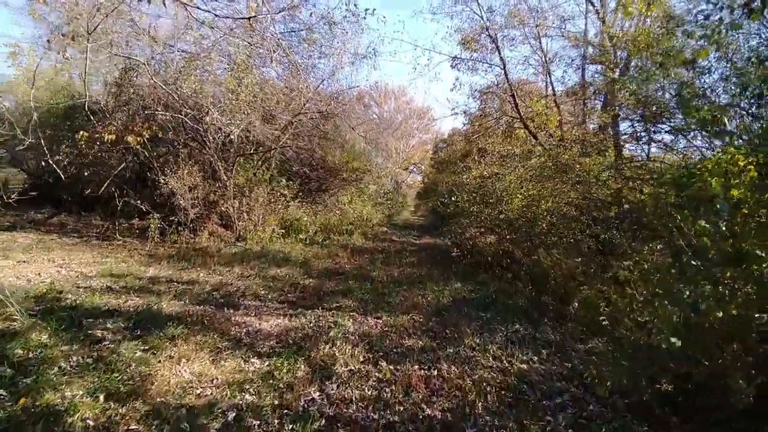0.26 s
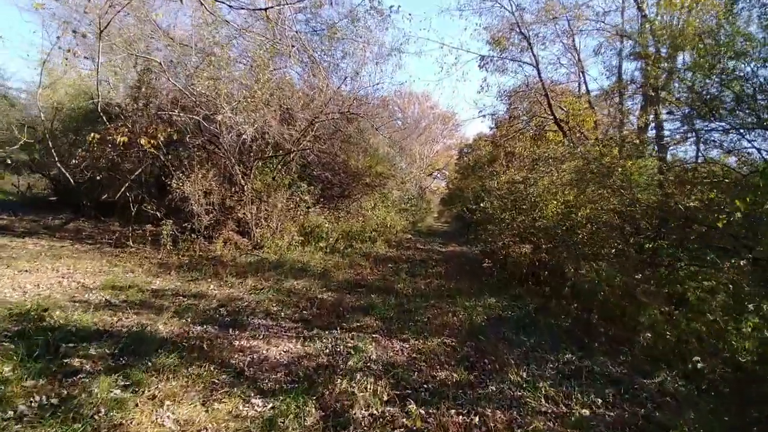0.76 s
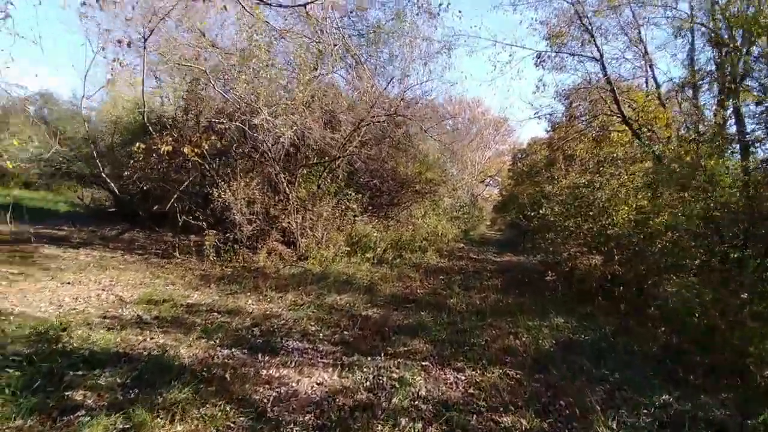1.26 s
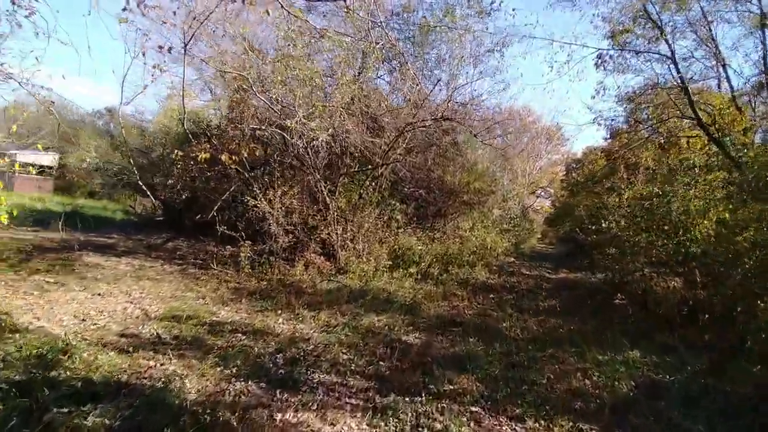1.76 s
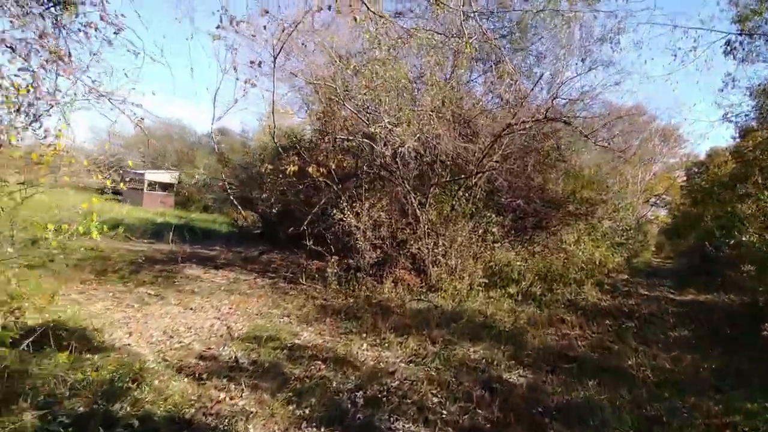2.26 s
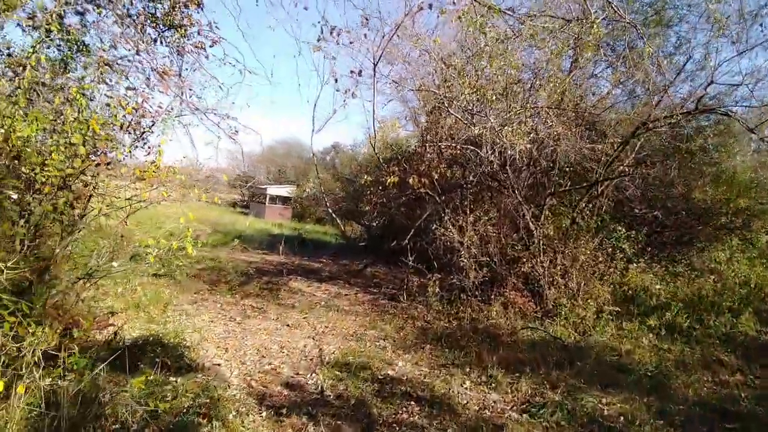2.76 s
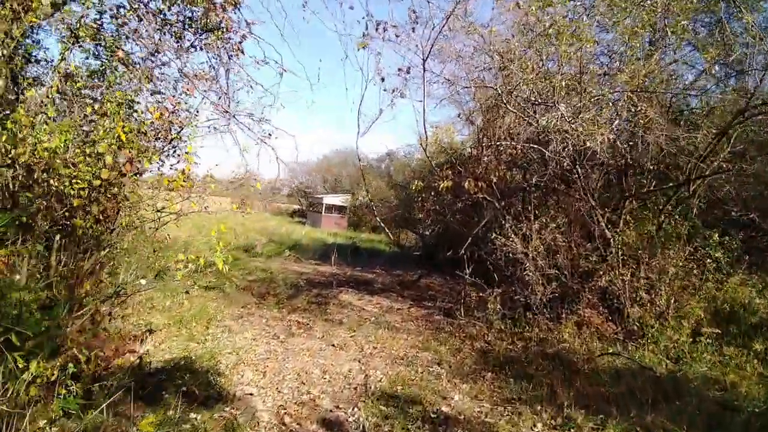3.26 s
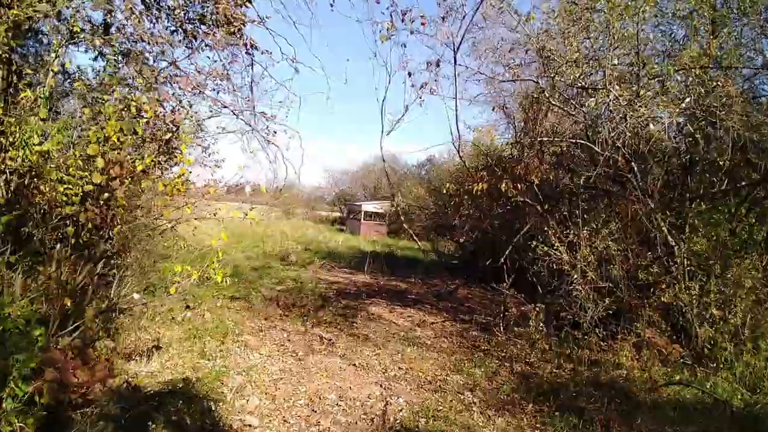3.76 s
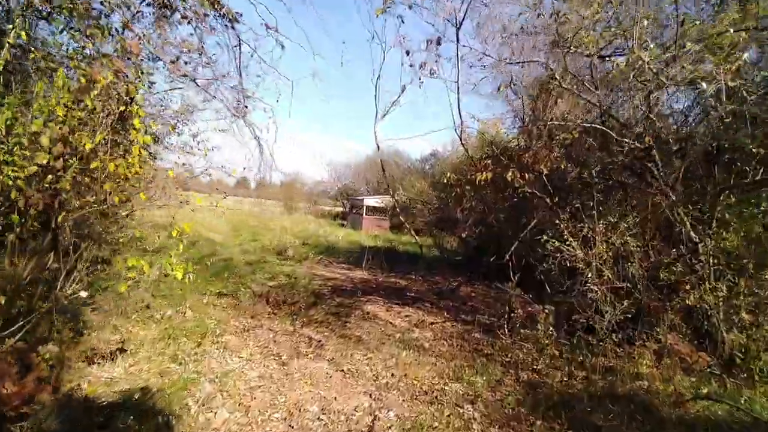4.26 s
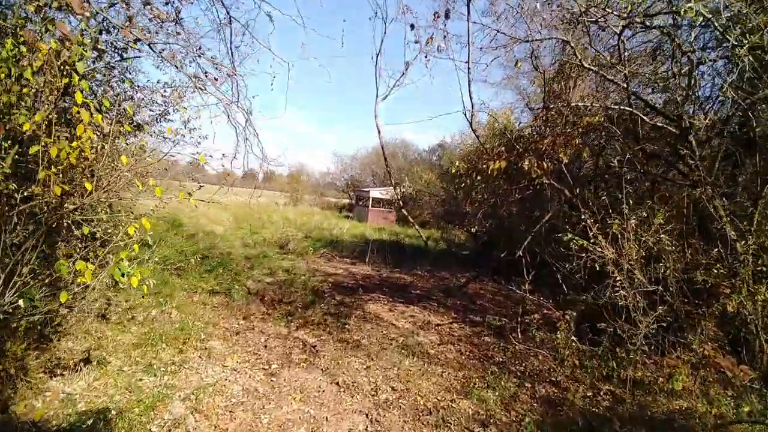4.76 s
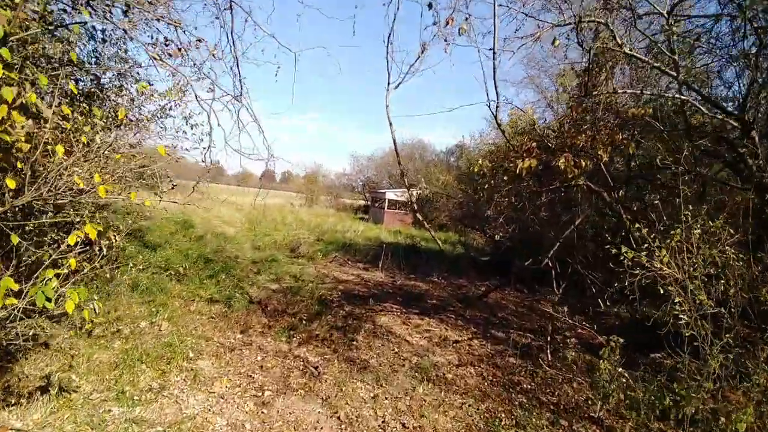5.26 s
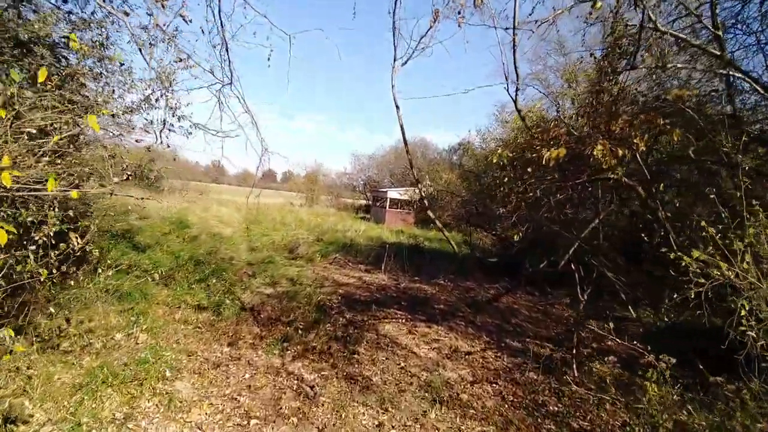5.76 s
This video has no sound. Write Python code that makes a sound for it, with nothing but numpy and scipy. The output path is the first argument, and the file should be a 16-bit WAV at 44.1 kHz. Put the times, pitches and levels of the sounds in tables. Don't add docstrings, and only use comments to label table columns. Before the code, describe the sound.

Walking through dry leaf litter on a quiet outdoor track, heard in stereo from a hand-held microphone above the feet. A crisp crunch starts at once and drags on to about 0.3 s, with sharp leaf snaps near 0.25 s. A fuller, louder crunch swells at 0.6-0.8 s, a softer one at 1.1-1.4 s, then a strong, abrupt one at 1.7-1.9 s. More crackling steps follow around 2.3-2.5, 2.9-3.1, 3.5-3.7 and 4.05-4.4 s, with thin rustles and little ticks between them. A heavier, duller step with a low thud lands near 4.85 s, trailing to 5.05 s. After that, only weaker rustles around 5.5-5.65 s and sparse dull twig ticks remain, fading almost to stillness. Beneath lie a faint airy hiss, slight low wind buffets mainly on the left early on, and a barely audible, wavering distant engine hum that fades.

```python
import sys
import numpy as np
from scipy import signal
from scipy.fft import rfft, irfft, next_fast_len
from scipy.io import wavfile
from scipy.ndimage import map_coordinates

SR = 44100
rng = np.random.default_rng(int(sys.argv[2]) if len(sys.argv) > 2 else 0)


def gain_from_decibels(decibels):
    exponent = np.asarray(decibels, float) / 20
    return 10 ** exponent


def transcribe(signal):
    frames = np.atleast_2d(signal).T
    limited = np.clip(frames, -1, 1)
    pcm = np.round(limited * 32767).astype(np.int16)
    wavfile.write(sys.argv[1], SR, pcm)


N = 264597

# peak_s [s], rise_s [s], rustle_db [dB], hold_s [s], weight_db [dB]
TREADS = [(0.008, 0.085, -37, .005, -7), (0.026, .03, -39.5, 0.26, -4.5), (0.588, 0.091, -33, 0.069, -6.5),
          (1.108, 0.019, -43, 0.1, -7), (1.718, 0.0064, -31, 0.073, -6.5),
          (2.317, 0.0095, -38.5, 0.013, -3), (2.341, 0.025, -36.5, 0.2, -4.5),
          (2.895, 0.011, -47.5, 0.056, 0), (3.101, 0.005, -44.5, 0.027, -2), (3.158, .02, -50.5, .005, -4),
          (3.502, .016, -39, 0.08, -8), (3.665, 0.091, -37, 0.061, -2), (4.056, 0.07, -43, 0.055, -0.5),
          (4.305, .006, -44, .005, -6), (5.71, .006, -52, 0.0053, 0), (4.36, 0.055, -41, 0.01, 0),
          (4.83, 0.024, -43, 0.031, 21.5), (4.868, 0.081, -36.5, 0.036, 0.5)]
# peak_s [s], rise_s [s], rustle_db [dB], hold_s [s], dullness_db
# [dB]
DRAGS = [(0.184, .1, -39.5, 0.1, -4), (0.619, 0.13, -32, 0.015, -2.5), (0.712, 0.074, -32.5, 0.032, 0.5),
         (1.306, 0.13, -39.5, 0.073, 0), (1.6, 0.067, -43, 0.029, 8.5), (1.644, .08, -39, 0.036, 1.5),
         (1.79, 0.08, -32.5, 0.045, 2.5), (1.844, 0.13, -39, 0.095, -1), (2.44, 0.13, -38.5, 0.015, -4),
         (2.634, .1, -46.5, 0.036, 0.5), (2.96, 0.11, -44, 0.078, 1), (3.04, .13, -36, 0.0094, -5.5),
         (4.138, 0.13, -40, 0.12, -5), (4.27, 0.093, -38.5, 0.022, -1.5), (4.4, 0.066, -41.5, 0.087, -8.5),
         (4.5, 0.13, -47.5, 0.058, -2.5), (5, .2, -43, 0.036, -1.6), (5.483, 0.079, -51.5, 0.19, 9.5),
         (5.577, 0.11, -43, 0.033, 5), (5.628, .1, -49, 0.058, 0.5)]
# peak_s [s], rise_s [s], rustle_db [dB], hold_s [s], dullness_db [dB]
STIRS = [(0.323, 0.037, -52.5, .13, 3), (0.808, 0.062, -48, 0.032, -5), (0.87, .05, -53.5, 0.068, 1),
         (1.004, .05, -67, .09, -4), (1.5, 0.17, -59, .05, 6.5), (1.973, 0.043, -51, 0.08, 0.5),
         (2.098, 0.0091, -57, .005, 2), (2.14, .05, -64, 0.13, 2), (2.74, .05, -65.5, .14, 4.5),
         (3.234, 0.017, -50.5, .02, 2.5), (3.26, 0.063, -53.5, .065, 2), (3.366, 0.0108, -49, 0.0033, 1.5),
         (3.43, 0.083, -57, .03, 0.5), (3.8, 0.037, -57.5, 0.12, 4.5), (3.932, 0.042, -56.5, .01, 0),
         (3.995, .003, -49.5, .006, -3), (4.623, .03, -66, 0.084, 7), (4.79, 0.22, -58.5, .02, 3),
         (5.104, 0.17, -54.5, 0.12, 2), (5.34, 0.16, -55, .03, 2.5), (5.41, .006, -55.5, 0.027, 2),
         (5.712, .05, -60.5, .06, 4), (5.8, .05, -67.5, 0.017, 0.5), (5.87, 0.12, -75.5, .14, -5)]
# time_s [s], dry_edge_db [dB]
DRYNESS = [(0.0, -0.5), (0.3, 5.5), (0.95, -2.5), (1.35, 3.5), (1.7, -0.5), (2.55, 2), (3.0, 3), (3.35, -5),
           (4.0, 5), (4.6, -1.5), (5.3, 8), (6.0, 10.5)]
# start_s [s], peak_db [dB]
SNAPS = [(0.0118, -14), (0.2474, -17.5), (0.2598, -24.5), (0.277, -24), (0.769, -40), (1.2757, -28.5),
         (1.279, -27), (1.3054, -23), (1.3733, -22.5), (1.9702, -30.5), (1.9757, -34), (2.1094, -32),
         (2.4447, -22.5), (2.5037, -25), (2.5468, -31), (2.853, -38), (2.8935, -32), (2.976, -31),
         (3.048, -29), (3.1194, -25), (3.7065, -28), (3.8639, -37), (3.9045, -33.5), (4.066, -28),
         (4.1626, -25), (4.306, -27), (4.3543, -23), (4.3792, -22.5), (4.6142, -43), (4.9906, -25)]
# start_s [s], peak_db [dB], low_part_db [dB re peak]
TICKS = [(0.3847, -39, -19), (0.8655, -68, -14), (0.9384, -51.5, -6), (1.0556, -47, -10), (1.0907, -42, -4),
         (1.4924, -48, -13), (2.0475, -32.5, -11), (2.1534, -45, -8), (2.5992, -51, -13),
         (2.7819, -41.5, -9), (2.7847, -43.5, -7), (3.204, -38, -25), (3.261, -38, -18), (3.321, -50, -2),
         (3.3636, -45, -10), (3.8027, -59, -15), (4.6449, -53, -4), (4.672, -42, -6), (4.6884, -44, -9),
         (4.7942, -45, -7), (5.3, -42.5, -5), (5.3374, -42, -15), (5.4062, -36.5, -5), (5.4907, -43, -14),
         (5.6462, -35.5, -6), (5.7077, -35.5, -2), (5.747, -42.5, -1.5), (5.7578, -38.5, -7),
         (5.793, -46, 4), (5.9256, -52, -3)]
# pitch_hz [Hz], level_db [dB per Hz]
LEFT_COLOUR = [(250, -20.5), (550, -10.5), (1400, -10), (2000, -4), (2250, -11), (2500, -7.5),
               (3000, -11.5), (4300, -4.5), (5150, -7.5), (6300, -1), (7900, 0.5), (10500, -4),
               (13800, -12.5), (14800, -8.5)]
# pitch_hz [Hz], level_db [dB per Hz]
RIGHT_COLOUR = [(250, -23), (400, -15.5), (580, -10), (900, -15), (1250, -12.5), (1600, -15.5),
                (2400, -9.5), (3050, -12.5), (4700, -5.5), (5200, -7.5), (6300, -3), (8000, -6),
                (10000, -12.5), (15000, -17.5)]
# pitch_hz [Hz], shared_part [0 to 1]
LIKENESS = [(250, .7), (550, .82), (850, .68), (1200, .82), (1700, .66), (2400, .85), (2750, .62),
            (3200, .93), (3700, .58), (4300, .82), (5200, .86), (7000, .66), (9000, .45), (15000, .3)]
# peak_s [s], level_db [dB]
THUDS = [
    (0.4, -72),
    (0.67, -78),
    (1.34, -70),
    (1.89, -84),
    (4.86, -68),
    (5.52, -73),
]
# peak_s [s], level_db [dB]
GUSTS = [
    (0.09, -56),
    (0.67, -59),
    (1.15, -74),
    (1.72, -68),
    (1.92, -64.5),
    (2.42, -68),
    (5.55, -86),
]
# time_s [s], level_db [dB]
HUM = [
    (0.0, -73.5),
    (1.5, -76),
    (3.1, -79.5),
    (4.6, -91),
    (6.0, -87),
]
# pitch_hz [Hz], level_db [dB per Hz]
HISS = [(200, -8.5), (500, -10.5), (800, -16), (3000, -10), (5600, -9.5), (10000, -43), (13500, -15.5),
        (15300, -16.5)]

RISE_DB, TOUCH_DB_PER_S = 20, 900
SAG_DB_PER_S, STIR_SAG_DB_PER_S, FALL_DB_PER_S = 56, 11, 268
TREAD_DB, DRAG_DB, STIR_DB = (0, -2.5), (1, -1.7), (-4, -6.5)
FAINT_DB, BODY_PER_DB, WEIGHT_PER_DB = -50.5, 0.24, 0.78
WEIGHT_PER_DULL = 0.65
SNAP_LOW_DB, LOW_PER_DB = -23.5, -0.62
PORT_LAG_MS = 0.4677
CAVITY_HZ, CAVITY_WIDTH_HZ, CAVITY_DB = 2090, 37, -11.5
THUD_DB_PER_S, RUMBLE_DB = 164, -81
GUST_RISE_DB_PER_S, GUST_FALL_DB_PER_S, BREEZE_DB = 165, 82, -93.5
HUM_HZ, HISS_DB = 117., -67
CUTOFF_HZ = 15800
STEP = 32


def leaves():
    rustle_db, body_db, weight_db, edge_db = footwork()
    edge_db = edge_db + curve(DRYNESS)
    crush = gain_from_decibels(.4 * (rustle_db + 48.0))
    wide = cracks(500. * crush, spread_db=4.0, clump_db=4.5)
    surge = np.tanh(drift(37.5))
    at, peak_db, low_db = snaps_and_ticks()
    edges = 200 * 2 ** np.arange(0, 6.6, .5)
    tint_db = 1.8 * rng.standard_normal((len(at), len(edges)))
    white = rng.standard_normal((2, 2, N))
    out = np.zeros((2, N))
    for k, (low, high) in enumerate(zip(edges, edges[1:])):
        octave = np.log2(np.sqrt(low * high) / 500)
        weight = np.interp(octave, [0, 2], [1, 0])
        body = np.interp(octave, [0, 2, 3], [0, 1, 0])
        edge = np.interp(octave, [4, 5], [0, 1])
        fade_s = 0.00057 + 0.0017 / 2 ** octave
        narrow = cracks(300. * crush, spread_db=4.5, clump_db=4.0)
        grain = dying(wide + 2.26 * narrow, fade_s)
        grain = 1.024 + grain / grain.mean()
        shape_db = body * body_db + weight * weight_db + edge * edge_db
        level_db = rustle_db + shape_db + 1.83 * surge + 0.43 * drift(45.0)
        blow_db = peak_db - 1.5 + (body + weight) * (low_db + 15.5) - 13.5 * weight
        blow_db = blow_db + 0.28 * edge * (edge_db[at] + 7.0) + tint_db[:, k]
        blows = np.zeros(N)
        blows[at] = gain_from_decibels(2 * blow_db)
        power = gain_from_decibels(2 * level_db) * grain + dying(blows, 0.77 * fade_s)
        out += band(np.sqrt(power) * white[k % 2], low, high)
    return out


def footwork():
    rows = [(*r, SAG_DB_PER_S, *TREAD_DB) for r in TREADS]
    kinds = ((DRAGS, SAG_DB_PER_S, DRAG_DB), (STIRS, STIR_SAG_DB_PER_S, STIR_DB))
    for table, sag, (weight, edge) in kinds:
        rows += [(*r, weight + WEIGHT_PER_DULL * dull, sag, dull, edge) for *r, dull in table]
    s, rise_s, db, hold_s, weight, sag, body, edge = np.transpose(rows)
    power = swells(s, RISE_DB / np.maximum(rise_s, .003), db, hold_s, sag[:, None], FALL_DB_PER_S)
    early_s = (s - rise_s)[:, None] - np.arange(power.shape[1]) * STEP / SR
    power = power * gain_from_decibels(-2 * TOUCH_DB_PER_S * np.clip(early_s, 0, .1)) + 1e-30
    total = power.sum(axis=0)
    level_db = 10 * np.log10(total)
    body_db, weight_db, edge_db = [v @ power / total for v in (body, weight, edge)]
    faint = np.clip(FAINT_DB - level_db, 0, 20)
    body_db = body_db + BODY_PER_DB * faint
    weight_db = weight_db + WEIGHT_PER_DB * faint
    return [full_rate(v) for v in (level_db, body_db, weight_db, edge_db)]


def cracks(per_s, spread_db, clump_db):
    born = rng.random(N) < per_s * gain_from_decibels(clump_db * drift(40.)) / SR
    size_db = spread_db * np.minimum(rng.exponential(1, N), 3.0)
    power = born * gain_from_decibels(2 * size_db) / per_s
    return power / power.mean()


def snaps_and_ticks():
    snaps = [(s, db, SNAP_LOW_DB + LOW_PER_DB * (db + 58)) for s, db in SNAPS]
    s, peak_db, low_db = np.transpose(snaps + list(TICKS))
    return np.round(s * SR).astype(int), peak_db, low_db


def dying(power, decay_s):
    return signal.lfilter([1], [1, -np.exp(-1 / (decay_s * SR))], power + 1e-18)


def ports(common, own):
    hz, alike = np.transpose(LIKENESS)
    alike = np.clip(alike, .05, .98)
    lag_ms = PORT_LAG_MS + .01 * drift(5.)
    late = map_coordinates(common, [np.arange(N) - lag_ms * SR / 1000], order=5, mode="nearest")
    right = colour(late, hz, 20 * np.log10(alike)) + colour(own, hz, 10 * np.log10(1 - alike ** 2))
    left = common + gain_from_decibels(CAVITY_DB) * resonance(common, CAVITY_HZ, CAVITY_WIDTH_HZ)
    left = colour(left, *np.transpose(LEFT_COLOUR))
    right = colour(right, *np.transpose(RIGHT_COLOUR))
    return gain_from_decibels(7.0) * np.array([left, right])


def resonance(x, hz, width_hz):
    r = np.exp(-np.pi * width_hz / SR)
    poles = [1, -2 * r * np.cos(2 * np.pi * hz / SR), r * r]
    return signal.lfilter(np.array([1, 0, -1]) * (1 - r * r) / 2, poles, x)


def ground_rumble():
    level_db = bursts(THUDS, THUD_DB_PER_S, THUD_DB_PER_S, RUMBLE_DB) + 2.6 * drift(6.7)
    common, left, right = rms_one(band(rng.standard_normal((3, N)), 67.0, 244.0))
    return gain_from_decibels(level_db) * (common + 1.12 * np.array([left, right]))


def wind():
    level_db = bursts(GUSTS, GUST_RISE_DB_PER_S, GUST_FALL_DB_PER_S, BREEZE_DB)
    lumps = gain_from_decibels(1.7 * np.array([drift(22.0), drift(8.7)]))
    gusts = band(rng.standard_normal((2, N)), 71.0, 121.0) * lumps
    return gain_from_decibels(level_db) * rms_one(gusts) * gain_from_decibels([[5.], [-7.]])


def far_engine():
    level_db = curve(HUM) + 1.3 * drift(5.3)
    cycles = HUM_HZ * np.cumsum(1 + 0.012 * drift(5.4)) / SR
    return gain_from_decibels(level_db) * np.sin(2 * np.pi * cycles)


def open_air():
    common, left, right = rms_one(colour(rng.standard_normal((3, N)), *np.transpose(HISS)))
    return gain_from_decibels(HISS_DB + 4.5 * drift(8.7)) * (0.36 * common + np.array([0.19 * left, 0.56 * right]))


def swells(s, rise_db_per_s, db, hold_s, sag_db_per_s, fall_db_per_s):
    t = np.arange(0, N + STEP, STEP) / SR - np.reshape(s, (-1, 1))
    rise, db, hold = (np.reshape(v, (-1, 1)) for v in (rise_db_per_s, db, np.maximum(hold_s, 0)))
    after = -sag_db_per_s * t - fall_db_per_s * np.maximum(t - hold, 0)
    return gain_from_decibels(2 * (db + np.minimum(rise * t, after))) + 1e-30


def bursts(rows, rise_db_per_s, fall_db_per_s, floor_db):
    s, db = np.transpose(rows)
    power = swells(s, rise_db_per_s, db, 0, 0, fall_db_per_s).sum(axis=0)
    return full_rate(10 * np.log10(power + gain_from_decibels(2 * floor_db)))


def full_rate(v):
    return np.interp(np.arange(N) / STEP, np.arange(len(v)), v)


def curve(rows):
    s, value = np.transpose(rows)
    return np.interp(np.arange(N) / SR, s, value)


def drift(rate_hz):
    r = np.exp(-40 * np.pi * rate_hz / SR)
    noise = rng.standard_normal(N // 20 + 2002)
    slow = signal.lfilter([1], [1, -2 * r, r * r], noise)[2000:]
    return np.interp(np.arange(N) / 20, np.arange(len(slow)), rms_one(slow))


def rms_one(x):
    return x / np.sqrt(np.mean(x ** 2) + 1e-20)


def band(x, low_hz, high_hz):
    return signal.sosfilt(signal.butter(2, [low_hz, high_hz], "band", fs=SR, output="sos"), x)


def colour(x, hz, db):
    size = next_fast_len(N + 4096)
    grid = np.maximum(np.arange(size // 2 + 1) * SR / size, 1)
    log_gain = np.interp(np.log(grid), np.log(hz), db) * np.log(10) / 20
    cepstrum = irfft(log_gain, size)
    cepstrum[1:size // 2] *= 2
    cepstrum[size // 2 + 1:] = 0
    return irfft(rfft(x, size) * np.exp(rfft(cepstrum)), size)[..., :N]


def scene():
    return ports(*leaves()) + ground_rumble() + wind() + far_engine() + open_air()


def band_limit(x):
    return signal.sosfilt(signal.butter(12, 16360, fs=SR, output="sos"), x)


def record(dry):
    steep = signal.ellip(14, .5, 60, CUTOFF_HZ, fs=SR, output="sos")
    mix = signal.sosfilt(steep, dry)
    return band_limit(mix)


dry = scene()
out = record(dry)
transcribe(out)
```